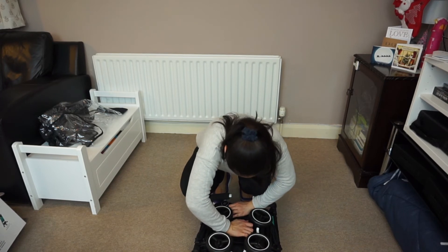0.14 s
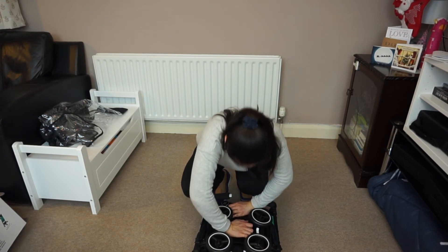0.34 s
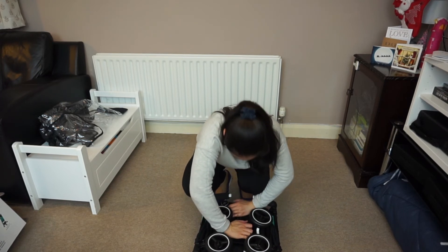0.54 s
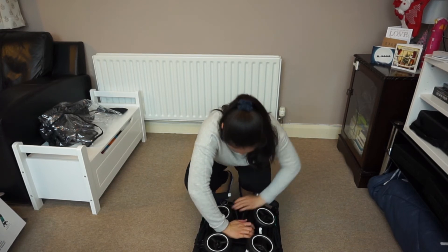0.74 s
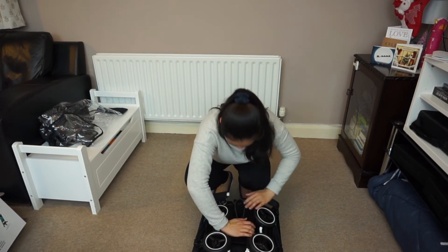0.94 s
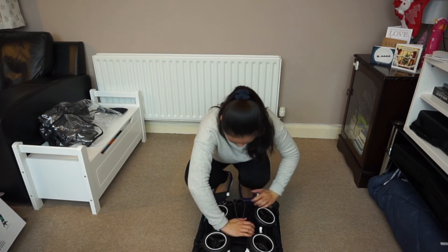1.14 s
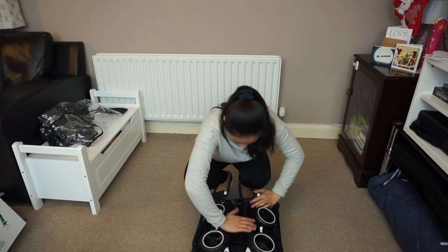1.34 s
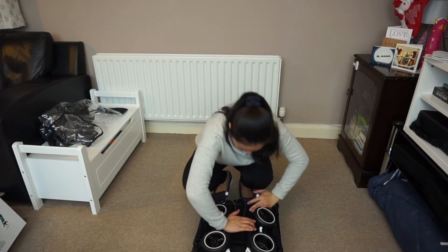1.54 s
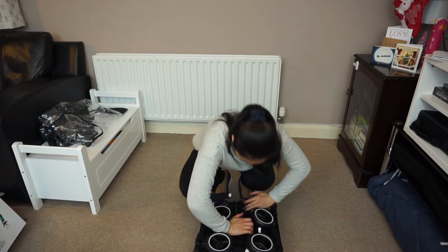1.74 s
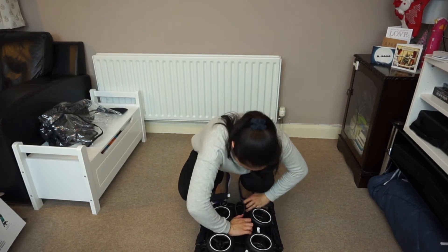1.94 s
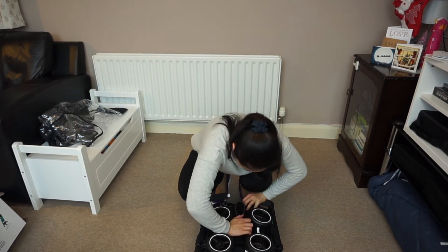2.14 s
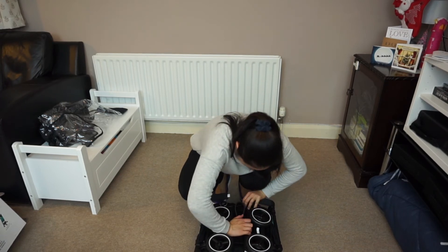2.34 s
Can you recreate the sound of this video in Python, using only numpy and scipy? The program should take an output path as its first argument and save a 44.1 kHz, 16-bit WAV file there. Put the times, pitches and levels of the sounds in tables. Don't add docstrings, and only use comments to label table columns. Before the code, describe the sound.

A stroller frame is pressed down by hand on carpet. After a faint opening knock, a hard plastic catch snaps at 0.24 s, bouncing and ringing until about 0.39. A softer second catch clacks at 0.67, and the frame lands and rattles from 0.72 to 0.85. Quiet rubbing, a small tick at 1.37, knocks at 1.6, ticks and creaks with a stronger fabric rub around 1.75, soft pats at 2.0. Short room reverberation, low hiss.

```python
import sys
import numpy as np
from scipy import signal
from scipy.fft import rfft, irfft, next_fast_len
from scipy.io import wavfile
from scipy.ndimage import uniform_filter1d

SR = 44100
rng = np.random.default_rng(int(sys.argv[2]) if len(sys.argv) > 2 else 0)


def unload_wav(signal):
    wavfile.write(
        sys.argv[1],
        SR,
        np.round(np.clip(np.atleast_2d(signal).T, -1, 1) * 32767).astype(np.int16),
    )


def gain_from_decibels(decibels):
    exponent = np.asarray(decibels, float) / 20
    return 10 ** exponent


N = 105840


def unit(x):
    return x / np.sqrt(np.mean(x ** 2) + 1e-20)


def along(points, hz):
    f, v = np.transpose(points)
    return np.interp(np.log(hz + 1), np.log(f + 1), v)


def level_over_time(points):
    s, level_db = np.transpose(points)
    return gain_from_decibels(np.interp(np.arange(N) / SR, s, level_db))


def filtered(x, response):
    m = next_fast_len(x.shape[-1] + 8192)
    spectrum = rfft(x, m) * response(np.fft.rfftfreq(m, 1 / SR))
    return irfft(spectrum, m)[..., :x.shape[-1]]


def lead(points, hz):
    return np.exp(np.outer([.5j, -.5j], along(points, hz)))


def pair(spectrum, alike, size):
    def response(hz):
        turn = np.arccos(np.clip(along(alike, hz), -1, 1)) / 2
        return gain_from_decibels(along(spectrum, hz)) * np.array([np.cos(turn), np.sin(turn)])
    mid, side = filtered(rng.standard_normal((2, size)), response)
    return unit(np.array([mid + side, mid - side]))


# (frequency [Hz], level [dB])
HISS = [(30, -72.5), (70, -30), (110, -26), (350, -7.5), (700, -8.5), (1000, -9.5), (1900, -14.5),
        (10700, -27.5)]
# (frequency [Hz], correlation)
HISS_ALIKE = [(100, 0.36), (250, 0.59), (700, 0.41), (1400, 0.22), (3000, 0.49), (4500, 0.092), (10000, 1)]
# (frequency [Hz], left lead [radians])
HISS_LEAD = [(200, 0), (500, 3.04), (1400, 1.7), (2500, 1.09)]
# (frequency [Hz], width [Hz], level [dB])
DRONE = [(416, 100, 0.5), (1390, 310, 7.5), (2700, 600, 3.5)]
# (frequency [Hz], level [dB])
HUM = [(100, -93)]


def background():
    t = np.arange(N) / SR
    hum = sum(np.sqrt(2) * gain_from_decibels(db) * np.sin(2 * np.pi * hz * t) for hz, db in HUM)

    def colour(hz):
        bands_db = sum(db * np.exp(-(2 * (hz - c) / width) ** 2) for c, width, db in DRONE)
        return gain_from_decibels(bands_db) * lead(HISS_LEAD, hz)
    hiss_db = -66.5
    return gain_from_decibels(hiss_db) * filtered(pair(HISS, HISS_ALIKE, size=N), colour) + hum


# (frequency [Hz], time [s])
ROOM = [(150, 0.25), (400, 0.48), (1000, 0.27), (1380, 0.41), (2400, 0.42), (4700, 0.41), (7300, 0.29),
        (11000, 0.2)]
# (frequency [Hz], level [dB])
ROOM_COLOUR = [(200, -5), (500, 2), (1200, 0), (2500, -5), (4000, 0.5), (5200, 3.5), (8000, 1.5),
               (11000, 4.5)]
# (frequency [Hz], correlation)
ROOM_ALIKE = [(170, 1), (350, 0.85), (700, 0.73), (1400, 0.63), (3000, 0.52), (4500, 0.18), (7000, 0.15),
              (10500, 0.84)]


def room_tail():
    gap_s, build_s = 0.00033, 0.0068
    hz, t, z = signal.stft(pair(ROOM_COLOUR, ROOM_ALIKE, size=SR // 2), SR, nperseg=128)
    decay_s = np.clip(along(ROOM, hz), .05, 2)[:, None]
    tail = signal.istft(z * gain_from_decibels(-60 * t / decay_s), SR, nperseg=128)[1]
    t = np.arange(tail.shape[1]) / SR
    tail = tail * (1 - np.exp(-np.maximum(t - gap_s, 0) / build_s))
    return tail / np.sqrt(np.sum(tail ** 2) / 2)


def in_room(x, wet_db):
    return gain_from_decibels(wet_db) * signal.fftconvolve(x[None], room_tail(), axes=1)


# (time [s], level [dB])
SWISH = [(0, -77.5), (1.18, -84.5), (1.3, -70), (1.4, -74.5), (1.5, -81), (1.58, -70.5), (1.68, -74),
         (1.74, -67.5), (1.8, -75), (1.95, -76), (2.4, -80)]
# (frequency [Hz], level [dB])
SLEEVE = [(2500, -32.5), (4500, -10), (7000, -11), (9500, -1.5), (11500, -2)]
# (frequency [Hz], correlation)
SLEEVE_ALIKE = [(4500, 0.35), (10000, 1)]


def sleeve():
    return pair(SLEEVE, SLEEVE_ALIKE, size=N) * level_over_time(SWISH)


# (time [s], level [dB])
RUB = [(0, -63.5), (0.151, -62.5), (.24, -60), (.6, -72), (.9, -64), (1.1, -79), (1.221, -72),
       (1.299, -67.5), (1.441, -74), (1.569, -67), (1.6, -74.5), (1.74, -54), (1.8, -55.5), (1.949, -64),
       (2.15, -64), (2.4, -68)]
# (frequency [Hz], level [dB])
CLOTH = [(120, -36.5), (250, -14), (450, -4.5), (850, -8), (1400, -5.5), (2700, -10), (4500, -26),
         (11000, -32.5)]


def rubbing():
    grain_db, rub_db, wet_db = 2.2, -3, -5
    unevenness = unit(uniform_filter1d(rng.standard_normal(N), size=130))
    grains = rng.standard_normal(N) * gain_from_decibels(grain_db * unevenness)
    cloth = unit(filtered(grains, lambda hz: gain_from_decibels(along(CLOTH, hz))))
    direct = cloth * gain_from_decibels(rub_db) * level_over_time(RUB)
    return direct + in_room(direct, wet_db)[:, :N]


def add(track, start, sound):
    cut = max(-start, 0)
    part = sound[:, cut:cut + N - start - cut]
    track[:, start + cut:start + cut + part.shape[1]] += part


def struck(body, spot_hz, skid_s):
    focus_db, focus_octaves, skid_share = 10, 0.29, 0.19
    fizz_hz, fizz_s = 4200, 0.0074
    t = np.arange(2048) / SR

    def ring(f, high):
        total = 0 * f
        for k, (c, width, db) in enumerate(body):
            if (c > fizz_hz) == high:
                focus = focus_db * np.exp(-(np.log2(c / spot_hz) / focus_octaves) ** 2)
                resonance = 1j * f * width / (c * c - f * f + 1j * f * width)
                total = total + gain_from_decibels(db + focus) * resonance ** 2 * (-1) ** k
        return total
    skid = rng.standard_normal(len(t)) * gain_from_decibels(-60 * t / skid_s)
    skid = (t == 0) + skid_share * skid
    fizz = rng.standard_normal(len(t)) * gain_from_decibels(-60 * t / fizz_s)
    low = filtered(skid / np.linalg.norm(skid), lambda f: ring(f, False))
    high = filtered(fizz / np.linalg.norm(fizz), lambda f: ring(f, True))
    return (low + high) / np.abs(low + high).max()


def contacts(table, body, wet_db, skid_s):
    room_db = 8
    out = np.zeros((2, N))
    for s, db, spot_hz in table:
        knock = gain_from_decibels(db) * struck(body, spot_hz, skid_s)
        heard = in_room(knock, room_db + wet_db)
        heard[:, :len(knock)] += knock
        add(out, round(s * SR), heard)
    return out


# (time [s], level [dB], pitch [Hz])
PUSHES = [
    (.2425, -62.5, 90),
    (.674, -72, 40),
    (.72, -83, 40),
]
# (frequency [Hz], width [Hz], level [dB])
FLOOR_BODY = [(40, 60, -8), (90, 90, -1), (230, 150, 1.5)]


def floor_pushes():
    return contacts(PUSHES, FLOOR_BODY, wet_db=-16, skid_s=0.004)


# (time [s], level [dB], pitch [Hz])
PATS = [
    (.2185, -54, 700),
    (2.0145, -52.5, 480),
    (2.0215, -51.5, 420),
    (2.027, -58, 420),
]
# (frequency [Hz], width [Hz], level [dB])
PAT_BODY = [(420, 140, -5.5), (700, 200, -13)]


def pats():
    return contacts(PATS, PAT_BODY, wet_db=-15.5, skid_s=0.0038)


# (time [s], level [dB], pitch [Hz])
THUDS = [(.262, -36.5, 420), (.29, -45, 300), (.297, -38, 420), (.323, -49, 700), (.674, -46.5, 420),
         (.69, -57, 420), (.72, -51, 420), (.74, -56, 420), (1.991, -55.5, 700), (2.118, -63.5, 420),
         (2.145, -59, 300)]
# (frequency [Hz], width [Hz], level [dB])
THUD_BODY = [(300, 380, -7.5), (420, 68, -6), (700, 350, -2)]


def thuds():
    return contacts(THUDS, THUD_BODY, wet_db=-2.5, skid_s=0.0048)


# (time [s], level [dB], pitch [Hz])
CREAKS = [(.2255, -40, 1400), (.233, -65, 2000), (.663, -56.5, 2800), (.667, -41.5, 2000),
          (1.581, -57, 5500), (1.587, -50.5, 3200), (1.245, -59.5, 2800), (1.29, -58, 2800),
          (1.748, -53, 2000), (1.80, -55, 2600), (1.86, -54.5, 2600), (1.91, -60, 2600), (1.982, -59, 3200)]
# (frequency [Hz], width [Hz], level [dB])
CREAK_BODY = [(700, 1000, 0.5), (1400, 1000, 2.5), (2100, 1200, 5.5), (2700, 950, 4), (5500, 4000, -21)]


def creaks():
    return contacts(CREAKS, CREAK_BODY, wet_db=8.0, skid_s=0.045)


# (time [s], level [dB], pitch [Hz])
TICKS = [
    (1.265, -54, 2100),
    (1.3722, -45.5, 2600),
    (1.381, -54, 2600),
    (1.7525, -37, 2100),
    (1.758, -45, 2100),
    (1.765, -41.5, 2600),
    (1.774, -51, 2100),
    (1.807, -57, 1200),
    (1.9875, -48.5, 3200),
    (2.3625, -63, 1200),
]
# (frequency [Hz], width [Hz], level [dB])
TICK_BODY = [(618, 350, -13), (1200, 600, -4.5), (2100, 610, -0.5), (2600, 420, -1), (3200, 430, -2.5),
             (9620, 6400, -31)]


def ticks():
    return contacts(TICKS, TICK_BODY, wet_db=-7.5, skid_s=0.0032)


# (time [s], level [dB], pitch [Hz])
JOINTS = [(-.06, -35.5, 1340), (-.04, -41, 2000), (-.03, -43, 850), (.004, -42.5, 500), (1.176, -80, 2500),
          (1.184, -55.5, 850), (1.305, -53.5, 850), (1.593, -52, 2000), (1.5988, -37.5, 1620),
          (1.6002, -41, 1340), (1.6045, -39.5, 1720), (1.6115, -49, 1340), (1.633, -46, 2000),
          (1.6445, -42, 1200), (1.647, -43, 980), (1.661, -53, 1710), (1.689, -43.5, 1010),
          (1.7535, -45, 1200), (1.768, -44, 1340), (1.79, -49, 810), (1.826, -44, 1340), (1.885, -54, 500)]
# (frequency [Hz], width [Hz], level [dB])
JOINT_BODY = [(520, 210, -13.5), (850, 330, -10), (1340, 450, -6), (2000, 240, -5), (2600, 230, -17),
              (3380, 700, -24), (7500, 10000, -40.5)]


def joints():
    return contacts(JOINTS, JOINT_BODY, wet_db=-3.5, skid_s=0.0035)


# (time [s], level [dB], pitch [Hz])
SETTLE = [
    (.7183, -26.5, 2000),
    (.7243, -24.5, 1300),
    (.7255, -28, 2870),
    (.7335, -30, 1530),
    (.741, -38, 1300),
    (.752, -37, 1300),
    (.760, -45, 1660),
    (.771, -42, 1600),
]
# (frequency [Hz], width [Hz], level [dB])
SETTLE_BODY = [(500, 224, -1), (1300, 380, -3), (1660, 350, -0.5), (2200, 400, -3), (2870, 830, -10.5),
               (6500, 11000, -34)]


def settling():
    return contacts(SETTLE, SETTLE_BODY, wet_db=-7.0, skid_s=0.0024)


# (time [s], level [dB], pitch [Hz])
SECOND = [(.6731, -24.5, 2500), (.675, -21.5, 1600), (.679, -28.5, 2770), (.6825, -25.5, 1740),
          (.6865, -30, 1770), (.698, -38, 1600), (.7055, -32.5, 2800), (.800, -41, 2450), (.811, -44, 1600),
          (.821, -43, 2430), (.832, -44.5, 2800), (.845, -59, 1710)]
# (frequency [Hz], width [Hz], level [dB])
SECOND_BODY = [(480, 260, -8), (850, 280, -4), (1257, 190, -2.5), (1600, 550, -2.5), (2460, 890, -7),
               (2800, 930, -6), (4220, 1100, -21), (6400, 550, -26.5), (9940, 10000, -31.5)]


def second_catch():
    return contacts(SECOND, SECOND_BODY, wet_db=-6.5, skid_s=0.0025)


# (time [s], level [dB], pitch [Hz])
FIRST = [(.2396, -22.5, 2997), (.2412, -9, 3740), (.2426, -10.5, 2200), (.2441, -33, 2700),
         (.2466, -14.5, 800), (.2485, -14.5, 2200), (.2505, -19, 2200), (.2595, -27.5, 2200),
         (.2735, -21.5, 2674), (.2855, -21, 2700), (.2925, -24.5, 2200), (.2985, -22.5, 2700),
         (.3075, -24, 2200), (.318, -30.5, 2680), (.325, -30.5, 2200), (.335, -33, 2200), (.385, -37, 2700)]
# (frequency [Hz], width [Hz], level [dB])
FIRST_BODY = [(464, 480, -8.5), (761, 290, -4.5), (1310, 1020, -1), (2184, 530, 0.5), (2704, 440, 4),
              (3540, 900, -6), (4685, 1100, -13.5), (7550, 7100, -26.5), (11140, 1800, -24), (749, 27, -7),
              (2673, 38, 1.5), (2141, 71, -2)]


def first_catch():
    return contacts(FIRST, FIRST_BODY, wet_db=-5.0, skid_s=0.0025)


def scene():
    low_cut_hz = 130
    frame = pats() + thuds() + creaks() + ticks() + joints() + settling() + second_catch() + first_catch()
    frame = filtered(frame, lambda hz: (1j * hz / (low_cut_hz + 1j * hz)) ** 2)
    return background() + sleeve() + rubbing() + floor_pushes() + frame


def top_cut(x):
    return signal.sosfilt(signal.butter(12, 11730, fs=SR, output="sos"), x)


# (frequency [Hz], level [dB])
RIGHT_DB = [(300, 0.5), (700, 0), (1400, 0.5), (2800, 2.5), (6000, 2), (10000, 3)]
# (frequency [Hz], lead [radians])
LEFT_LEADS = [(60, .2), (350, 0.49), (700, 0.96), (2400, 1), (3200, 0.82), (8000, 0.23)]


def record(dry):
    top_hz, above_top_db = 11010, -64.5

    def camera(hz):
        ports = gain_from_decibels(np.outer([-.5, .5], along(RIGHT_DB, hz))) * lead(LEFT_LEADS, hz)
        return ports * gain_from_decibels(above_top_db * np.clip((hz - top_hz) / 900, 0, 1))
    return top_cut(filtered(dry, camera))


dry = scene()
out = record(dry)
unload_wav(out)
```